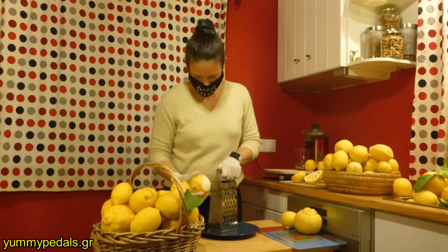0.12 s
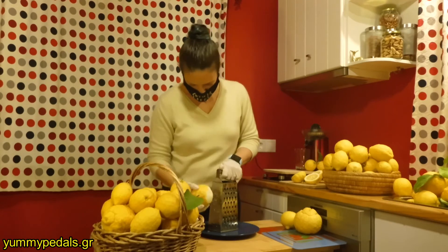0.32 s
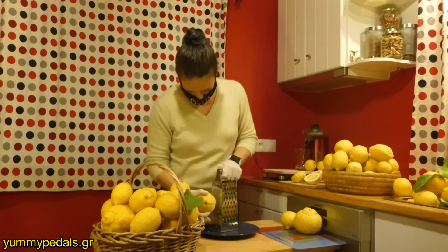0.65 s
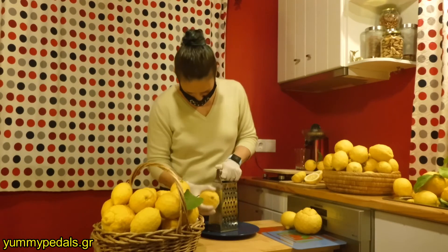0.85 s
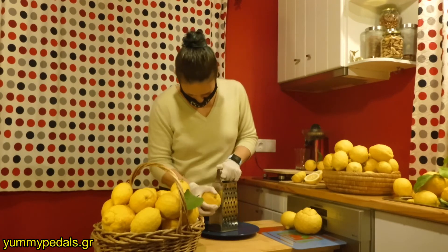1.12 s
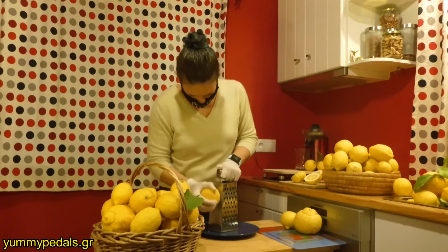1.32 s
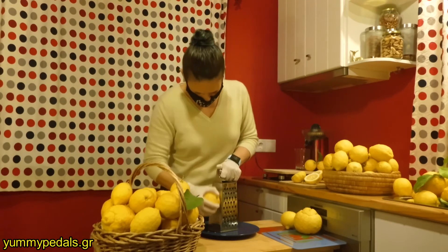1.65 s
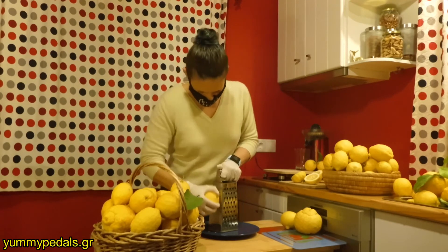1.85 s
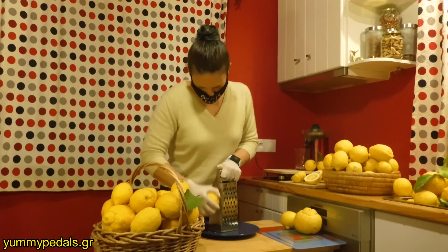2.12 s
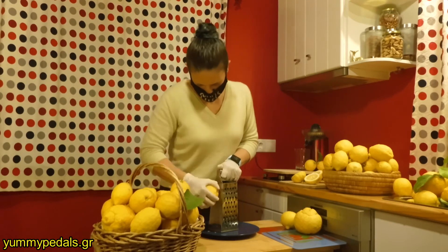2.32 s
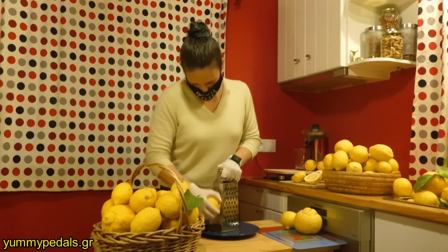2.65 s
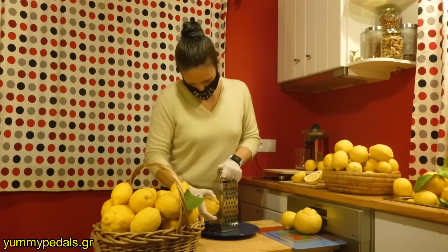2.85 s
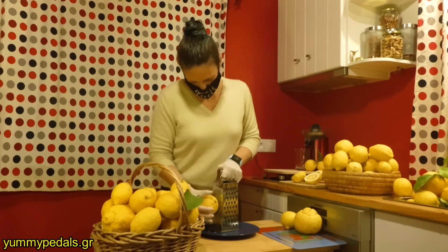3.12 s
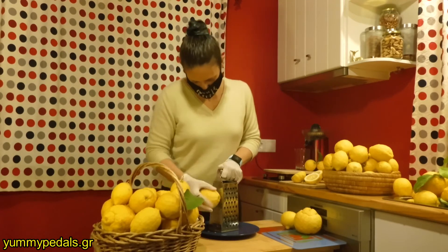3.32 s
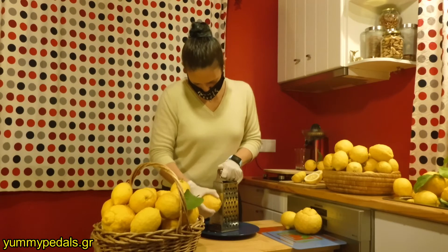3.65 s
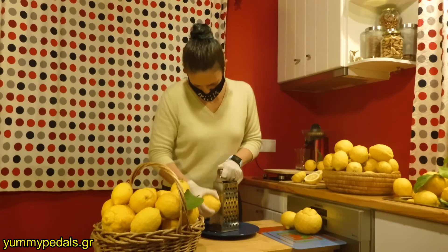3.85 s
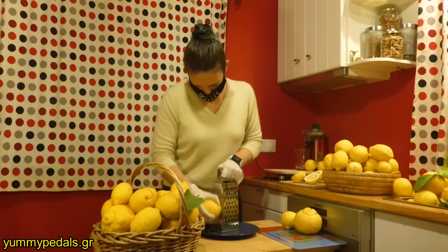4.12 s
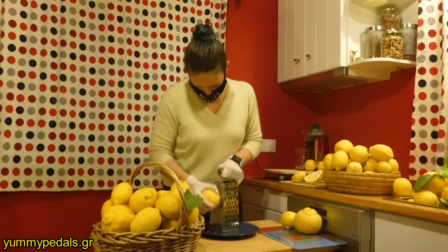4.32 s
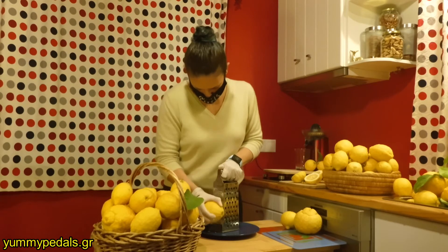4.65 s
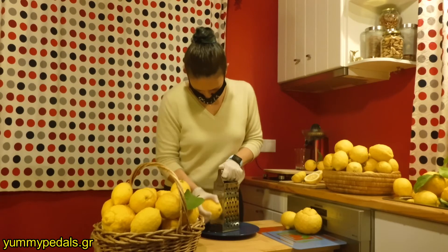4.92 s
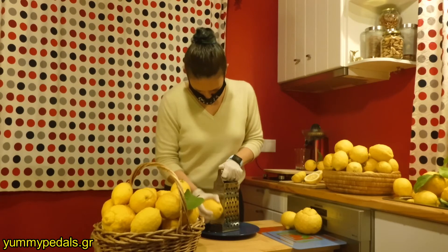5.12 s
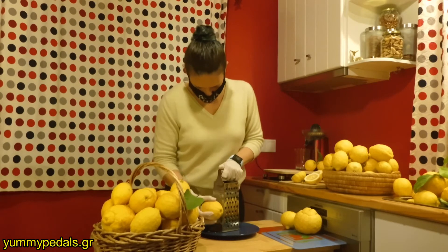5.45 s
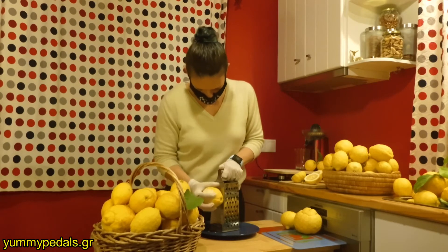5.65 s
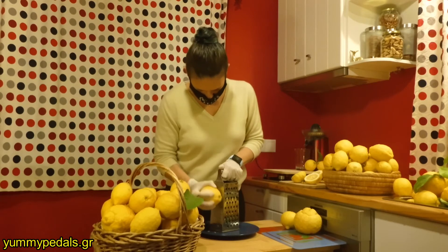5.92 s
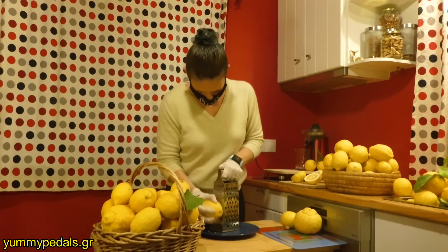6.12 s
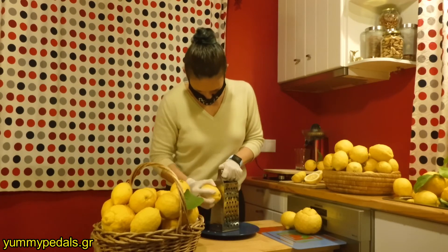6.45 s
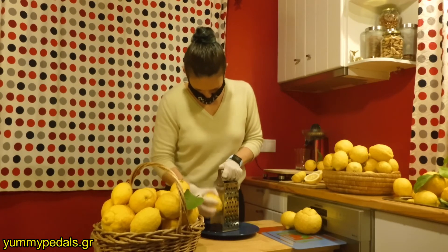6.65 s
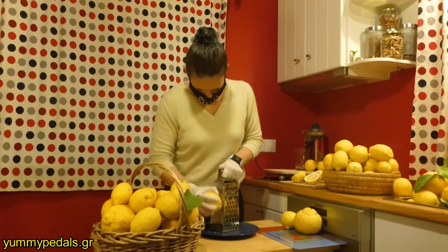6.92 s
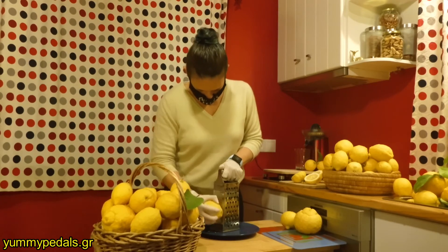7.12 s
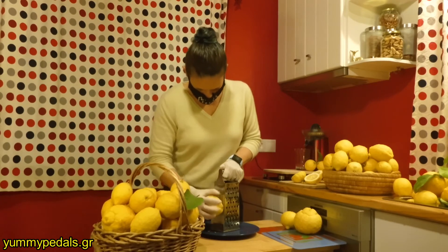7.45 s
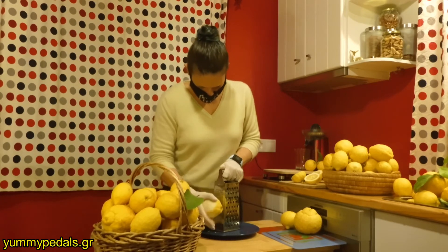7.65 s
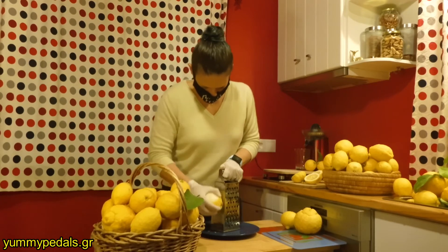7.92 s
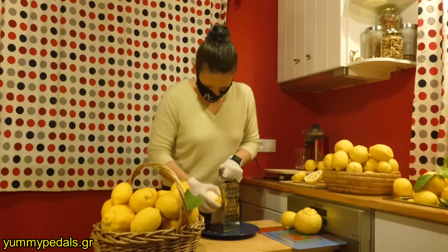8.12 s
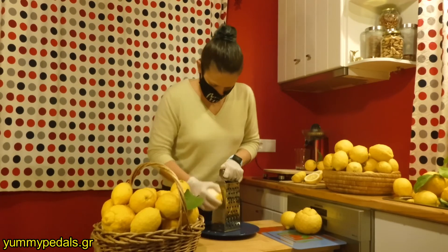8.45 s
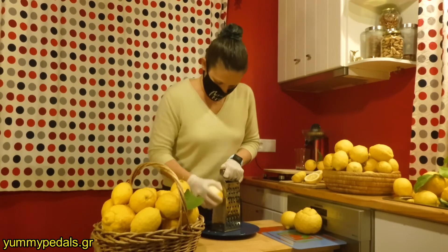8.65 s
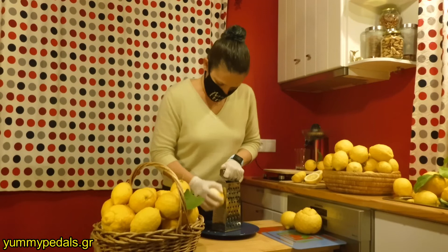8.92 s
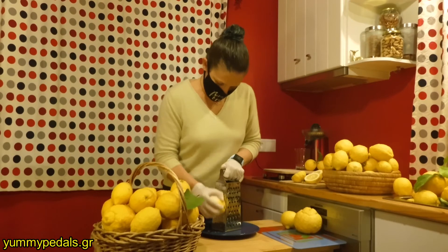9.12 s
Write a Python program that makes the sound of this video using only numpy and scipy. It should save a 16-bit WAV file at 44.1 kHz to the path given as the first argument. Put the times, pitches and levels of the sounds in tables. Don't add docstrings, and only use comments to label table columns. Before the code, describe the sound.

A lemon rubs against a metal box grater in four bouts of quick strokes, about four per second. Each downward cut is a strong, grainy rasp with ringing steel and a hollow hum; the return is lighter. Short pauses hold soft hiss and an occasional plastic tick from the camera housing. Close, fairly dry stereo in a small kitchen, the grater slightly to the right.

```python
import sys
import numpy as np
from scipy import signal
from scipy.fft import rfft, irfft, next_fast_len
from scipy.io import wavfile

SR = 44100
rng = np.random.default_rng(int(sys.argv[2]) if len(sys.argv) > 2 else 0)


def undo_db(level):
    steps = np.asarray(level, float) / 20
    return 10 ** steps


def dump_mix(stems):
    frames = np.atleast_2d(stems).T
    limited = np.clip(frames, -1, 1)
    pcm = np.round(limited * 32767).astype(np.int16)
    wavfile.write(sys.argv[1], SR, pcm)


N = 410130
SIZE = next_fast_len(N + SR)
HZ = np.maximum(np.fft.rfftfreq(SIZE, 1 / SR), 1)

# (frequency [Hz], width [Hz], level [dB])
PLATES = [(778, 58, -3.5), (829, 29, 2), (917.4, 15, 1.5), (1017, 10.8, 7), (1049, 61, -1.5),
          (1215, 13, 5.5), (1212, 28, 1.5), (1300, 33, 3.5), (1510, 21, -28), (1570, 23, 2.5),
          (1650, 9, -2), (1690, 29, -0.5), (1896, 46, -5.5), (1951, 38, 1)]


def rms_one(x):
    return x / np.sqrt(np.mean(x ** 2) + 1e-20)


def at_hz(points, hz=HZ):
    table_hz, values = np.array(points)[:, 0], np.array(points)[:, 1]
    return np.interp(np.log(hz), np.log(table_hz), values)


def coloured(x, gain):
    return irfft(rfft(x, SIZE) * gain, SIZE)[..., :N]


def drift(rate_hz):
    r = np.exp(-80 * np.pi * rate_hz / SR)
    noise = rng.standard_normal(N // 40 + 2002)
    slow = signal.lfilter([1], [1, -2 * r, r * r], noise)[2000:]
    return np.interp(np.arange(N) / 40, np.arange(len(slow)), rms_one(slow))


def resonance(x, hz, width_hz):
    r = np.exp(-np.pi * width_hz / SR)
    poles = [1, -2 * r * np.cos(2 * np.pi * hz / SR), r * r]
    return signal.lfilter([(1 - r * r) / 2, 0, (r * r - 1) / 2], poles, x)


def bells(rows):
    s = np.arange(0, N + 64, 64) / SR
    at_s, value, length_ms = np.transpose(rows)[:, :, None]
    return s, np.exp(-((s - at_s) / length_ms * 2e3) ** 2), value


def hiss():
    # (frequency [Hz], density [dB per Hz])
    hiss_colour = [(25, -34), (100, -21.5), (200, -11.5), (400, -3.5), (900, -3.5), (1500, -8), (2100, -12),
                   (2500, -19.5), (5000, -24), (9000, -32.5), (14000, -45.5)]
    noise = rms_one(coloured(rng.standard_normal((2, N)), undo_db(at_hz(hiss_colour))))
    level_db = -47 + 0.36 * drift(2.9)
    return undo_db(level_db) * noise


def kitchen(x):
    # (frequency [Hz], t60 [s])
    room_decay = [(150, 0.31), (1000, 0.33), (8000, 0.071)]
    out = np.zeros((2, N))
    for side, lags_s in enumerate(rng.uniform(0.012, 0.027, (2, 6))):
        loops = [undo_db(-60 * lag / at_hz(room_decay)) * np.exp(-2j * np.pi * HZ * lag) for lag in lags_s]
        out[side] = coloured(x, sum((-1) ** k * g / (1 - g) for k, g in enumerate(loops)))
    return out


def ticks():
    # (time [s], peak [dB], left over right [dB], share of top modes [dB], share of low modes [dB])
    slips = [
        (0.51, -18.5, 10, -3, -13),
        (3.46, -22, 7, -3, -9),
        (7.759, -17.5, 8, 6, -4),
        (8.71, -22, 11, 0, -3),
    ]
    # (frequency [Hz], level [dB])
    housing = [(620, 3.5), (810, 5), (1080, 0.5), (1320, 4.5), (1700, 0.5), (1880, -4), (2060, 0),
               (2250, -21), (4500, -29)]
    out, s = np.zeros((2, N)), np.arange(900) / SR
    shape = (1 - np.exp(-(s / 0.00078) ** 2)) * np.exp(-(s / 0.0061) ** 2)
    for at_s, peak_db, pan_db, top_db, low_db in slips:
        phases = rng.uniform(0, 2 * np.pi, len(housing))
        sound = np.zeros(len(s))
        for (hz, db), phase in zip(housing, phases):
            mode_db = db + top_db * (hz > 2000) + low_db * (hz < 1500)
            sound += undo_db(mode_db) * np.sin(2 * np.pi * hz * s + phase)
        sound *= shape
        at = round(at_s * SR)
        pan = undo_db([[pan_db / 2], [-pan_db / 2]])
        out[:, at:at + len(s)] += undo_db(peak_db - 5.5) * sound / np.max(np.abs(sound)) * pan
    return out


def squeak():
    start_s, end_s = 0.575, 0.615
    corners_s = [start_s - 0.005, start_s, end_s, end_s + 0.005]
    sounding = np.interp(np.arange(N) / SR, corners_s, [0, 1, 1, 0])
    tone = rms_one(resonance(rng.standard_normal(N), hz=2620, width_hz=60.0))
    return undo_db(-64.5) * sounding * tone


def free_plate():
    # (time [s], level [dB], length [ms])
    ring_outs = [(1.679, -38, 79), (2.572, -38, 43), (2.729, -33.5, 69), (3.607, -44, 57), (3.931, -30, 62),
                 (4.131, -27.5, 57), (4.739, -43, 32), (4.906, -41, 59), (5.118, -48, 73), (6.111, -31, 70),
                 (6.348, -35.5, 106), (7.124, -46, 70), (8.528, -36.5, 56), (9.067, -39, 39),
                 (4.19, -36, 45),
        (4.9, -33.5, 60),
        (6.385, -38, 42),
        (2.45, -36, 52),
        (6.64, -35, 28),
    ]
    # (frequency [Hz], level [dB])
    free_modes = [(1005, -6.5), (1072, 0)]
    s, rings, ring_db = bells(ring_outs)
    swell = np.sum(rings * undo_db(ring_db), axis=0)
    t = np.arange(N) / SR
    tones = np.zeros(N)
    for hz, db in free_modes:
        level = undo_db(db + 3.4 * drift(25.0))
        tones += level * np.sin(2 * np.pi * hz * t + 1.24 * drift(10.0))
    return np.interp(t, s, swell) * tones * undo_db(-1.5) * np.array([[1], [0.7]])


def catches():
    # (time [s], peak [dB])
    blow_rows = [
        (3.874, -32),
        (4.733, -32),
        (5.105, -33),
        (6.05, -37),
        (6.81, -28),
        (7.958, -45),
    ]
    at = [round(s * SR) for s, db in blow_rows]
    peak_db = np.array(blow_rows)[:, 1]
    out = np.zeros(N)
    for hz, width_hz, db in PLATES:
        blows = np.full(N, 1e-18)
        blows[at] = undo_db(peak_db + db - 32.0 + 2.4 * rng.standard_normal(len(at)))
        out += resonance(blows, hz, 2.8 * width_hz) * SR / (np.pi * width_hz)
    return signal.sosfilt(signal.butter(4, 2400, fs=SR, output="sos"), out)


def snaps(per_s, spread_db):
    sizes = undo_db(spread_db * np.minimum(rng.exponential(1, (2, N)), 5))
    signed = sizes * rng.choice([-1, 1], (2, N))
    return rms_one(signed * (rng.random((2, N)) < per_s / SR)) + 1e-9


def sheet():
    s = np.arange(6000) / SR
    wash = rng.standard_normal((2, len(s))) * undo_db(-60 * s / 0.046)
    trail = undo_db(-8) / np.sqrt(np.sum(wash[0] ** 2))
    return 1 + trail * rfft(wash, SIZE) / (1 + (2000 / HZ) ** 4)


def effort():
    # (time of greatest speed [s], rasp [dB], rise [ms], weight on the grater [dB])
    down = [(1.392, -40.5, 46.5, 1.5), (1.648, -41.5, 51, 0), (1.909, -41, 53, -2), (2.161, -37.5, 47.6, 0),
            (2.417, -40.5, 46, 1.5), (3.61, -44, 44, -3), (3.894, -39.5, 67, -3), (4.12, -39, 39, 0),
            (4.384, -38.5, 53, 0.5), (4.627, -41, 49, 0.5), (4.879, -41, 56, 1.5), (6.063, -38.5, 27, .5),
            (6.325, -39, 60, -.5), (6.572, -38.5, 38, 0), (6.84, -41, 52, 1.5), (7.094, -40.5, 41, 0),
            (7.335, -40.5, 34, -1.5), (8.267, -40.5, 70, .5), (8.538, -40.5, 61, .5), (8.799, -41, 63, -.5),
            (9.063, -45.5, 52, 0.5)]
    # (start [s], rasp [dB], length [ms], weight [dB])
    up = [(1.23, -51.5, 105, 0.5), (1.454, -49.5, 155, -2), (1.705, -51.5, 141, -0.5), (1.976, -50, 154, 0),
          (2.232, -49.5, 160, -.5), (2.478, -48.5, 144, -1), (3.7, -51, 122, -4.5),
          (3.955, -47.5, 125, -1.5), (4.18, -48, 174, -0.5), (4.449, -46, 132, -1.5),
          (4.697, -46.5, 138, 0), (4.948, -48, 131, 0.5), (5.9, -53, 122, 3), (6.145, -47, 135, 0),
          (6.396, -47, 131, 0), (6.657, -47, 126, 3), (6.916, -50, 138, 2), (7.156, -47, 146, -1),
          (8.068, -49, 128, 1), (8.332, -49.5, 150, 0), (8.593, -49.5, 163, 0.5), (8.858, -52.5, 164, .5),
          (9.108, -60, 200, 2.5), (9.205, -56.5, 113, 4.5)]
    # (time [s], rasp [dB], rise [ms], fall [ms], weight [dB])
    touches = [(.78, -65, 43, 70, 3.5), (1.068, -57.5, 28, 86, 0), (1.138, -53, 99, 96, 2),
               (1.425, -50, 22, 41, -6), (2.693, -44, 86, 98, -0.5), (2.872, -60, 140, 73, 2.5),
               (3.555, -68, 250, 50, -6), (5.126, -40.5, 51, 102, 2.5), (5.539, -62, 40, 130, -2),
               (5.803, -61, 46, 76, 0), (6.812, -43.5, 18, 30, -0.5), (7.96, -47.5, 26, 40, 1),
               (7.997, -44.5, 22, 70, 0)]
    # (plates [dB], box [dB])
    down_body_db, up_body_db, touch_body_db = (11.5, 6), (13, 7), (10, 7)
    down_ms = 136.9
    up_rise = 0.38
    strokes = []
    for at, db, rise, weight in down:
        strokes.append((at, db, rise, down_ms - rise, weight, *down_body_db))
    for at, db, ms, weight in up:
        rise = up_rise * ms
        strokes.append((at + rise / 1e3, db, rise, ms - rise, weight, *up_body_db))
    for row in touches:
        strokes.append((*row, *touch_body_db))
    peak_s, rasp_db, rise_ms, fall_ms, weight_db, plates_db, box_db = np.transpose(strokes)[:, :, None]
    s = np.arange(0, N + 64, 64) / SR
    away = np.where(s < peak_s, (peak_s - s) / rise_ms, (s - peak_s) / fall_ms) * 1e3
    level_db = rasp_db - 20 * away ** 1.763
    over_rasp_db = (0, plates_db + 0.57 * weight_db, box_db + weight_db)
    gains = [np.sqrt(np.sum(undo_db(level_db + over_db) ** 2, axis=0)) for over_db in over_rasp_db]
    return [np.interp(np.arange(N) / SR, s, g) for g in gains]


def body(modes, force, gain, wander_db):
    driven = gain * force
    rings = 0
    for k, (hz, width_hz, db) in enumerate(modes):
        wandering = driven * undo_db(wander_db * drift(4.0))
        rings = rings + (-1) ** k * undo_db(db) * resonance(wandering, hz, width_hz)
    return rms_one(rings) * np.sqrt(np.mean(gain ** 2))


def grating():
    # (time [s], depth [dB], length [ms])
    skip_rows = [
        (1.402, -9.5, 26),
        (2.165, -5.5, 25),
        (6.088, -1.5, 30),
        (6.265, -6, 16),
        (3.915, -2, 13),
    ]
    # (frequency [Hz], density [dB per Hz])
    rasp_colour = [(120, -36), (200, 3.5), (500, -2), (1400, 7), (2100, 0), (2600, -4.5), (4200, -5.5),
                   (5000, -9), (8000, -12), (10500, -17), (14000, -38.5)]
    # (frequency [Hz], width [Hz], level [dB])
    box_modes = [(152.7, 12, -20.5), (208.8, 9.6, -6.5), (253.8, 7.3, -9), (328.5, 15.8, 2.5),
                 (393, 32, -13), (449.4, 28.7, -2), (536, 41, -3.5), (649, 21, -2)]
    # (frequency [Hz], width [Hz], level [dB])
    web_modes = [(2357, 42, -7.5), (2800, 64, -7), (2965, 35, -7.5), (3286, 37, -17), (3950, 71, -25),
                 (5760, 18, -37)]
    rasp, plates, box = effort()
    s, skips, depth_db = bells(skip_rows)
    contact = undo_db(np.interp(np.arange(N) / SR, s, np.sum(skips * depth_db, axis=0)))
    force = snaps(per_s=7000, spread_db=2.5) * undo_db(1.0 * drift(33.0)) * contact

    torn = rms_one(coloured(force * rasp, undo_db(at_hz(rasp_colour)) * sheet()))
    tearing = undo_db(8.0) * torn * np.sqrt(np.mean(rasp ** 2))
    ringing = undo_db(-3.0) * body(PLATES, force, plates, wander_db=1.84)
    ringing += undo_db(1.5) * body(box_modes, force, box, wander_db=1.53)
    ringing += undo_db(-10.5) * body(web_modes, force, rasp, wander_db=3.0)
    grater = tearing + ringing + free_plate() + catches()
    return signal.sosfilt(signal.butter(3, 150.0, "high", fs=SR, output="sos"), grater)


def spread(pair):
    # (frequency [Hz], left-right likeness [0 to 1])
    likeness = [(60, 1), (180, 1), (520, 1), (1550, 0.96), (4580, 0.6), (13500, -0.0)]
    # (frequency [Hz], left over right [dB])
    balance = [(200, -1.9), (6000, -2), (13000, -3)]
    alike = np.clip(at_hz(likeness), -0.99, 0.99)
    lean = undo_db(at_hz(balance) / 2)
    mid, side = rfft(pair, SIZE) * np.sqrt([(1 + alike) / 2, (1 - alike) / 2])
    return irfft([(mid + side) * lean, (mid - side) / lean], SIZE)[:, :N]


def scene():
    pair = grating()
    grater = spread(pair) + undo_db(-36) * kitchen(pair[0])
    return grater + ticks() + squeak() + hiss()


def top_cut(x):
    return signal.sosfilt(signal.butter(12, 14120, fs=SR, output="sos"), x)


def record(dry):
    # (from time [s], top [Hz])
    band_top = [(0, 14300), (.59, 13550), (3.07, 12850), (5.27, 12150)]
    out, spectrum = np.zeros_like(dry), rfft(dry, SIZE)
    for s, top_hz in band_top:
        start = round(s * SR)
        out[:, start:] = irfft(spectrum * (HZ < top_hz), SIZE)[:, start:N]
    return top_cut(out)


dry = scene()
out = record(dry)
dump_mix(out)
```